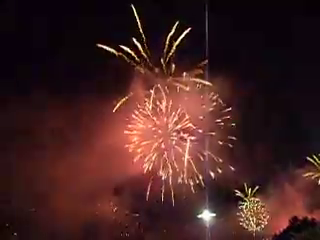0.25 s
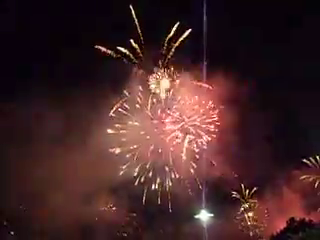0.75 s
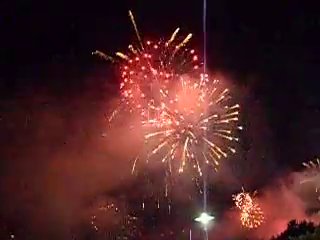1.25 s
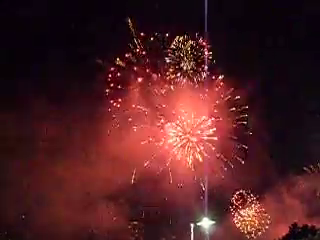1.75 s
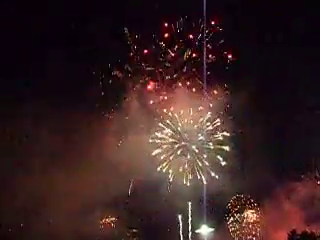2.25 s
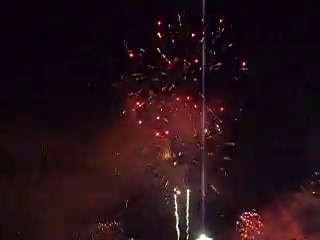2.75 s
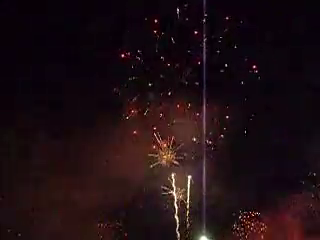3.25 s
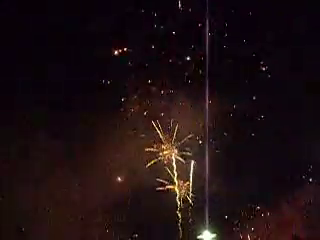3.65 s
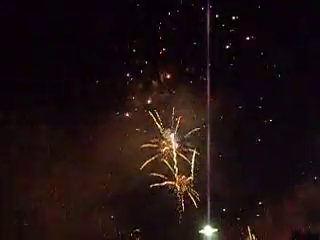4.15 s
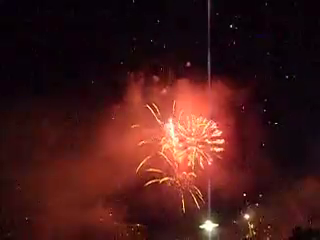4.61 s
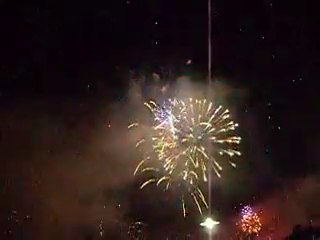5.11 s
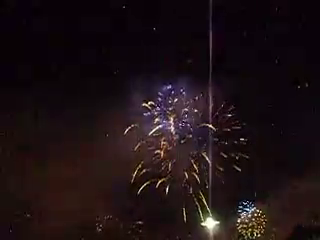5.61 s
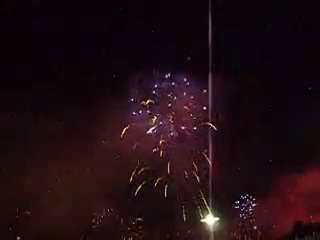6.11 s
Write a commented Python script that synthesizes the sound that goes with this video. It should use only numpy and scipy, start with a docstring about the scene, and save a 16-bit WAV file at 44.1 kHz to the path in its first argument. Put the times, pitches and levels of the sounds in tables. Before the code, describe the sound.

Aerial fireworks burst in quick, irregular succession, heard outdoors among buildings some way from the display. Each sharp bang slaps off the walls and trails into a rolling tail. Smaller cracks, distant pops and dull thuds fill the gaps over a continuous low rumble. A brief faint whistle sounds late on, before two more hard bangs. The biggest shells overload the microphone slightly.

```python
"""Outdoors among buildings at night, some way from a firework display: shells burst in quick succession. Each
blast wave arrives as a steep shock front, reflects off walls and scatters into a rolling tail. Small charges
crack and dull thuds sound in between, over a continuous low rumble and faint whistles. The biggest shells
overload the recorder, which clips their peaks."""
import sys
import numpy as np
from scipy import signal
from scipy.fft import rfft, irfft, next_fast_len
from scipy.io import wavfile
from scipy.ndimage import uniform_filter1d

SR = 44100
rng = np.random.default_rng(int(sys.argv[2]) if len(sys.argv) > 2 else 0)


def pcm_store(signal):
    """Save signal as 16-bit PCM."""
    levels = np.round(np.clip(np.atleast_2d(signal), -1, 1) * 32767)
    wavfile.write(sys.argv[1], SR, levels.astype(np.int16).T)


N = 280917
TIME = np.arange(N) / SR

# Levels in the tables are relative; each layer has its own gain in the mix.
# large shells: (time [s], shock level [dB], compression length [ms], front cutoff [Hz],
# scatter level [dB], roll level [dB], facade echo delay [s], echo level re shock [dB])
LARGE_SHELLS = [(0.0056, 5.5, 4, 7000, -4.5, -3, .0701, 2.5), (0.5987, 10.5, 4.5, 7000, -2.5, 0, 0.087, 2),
                (1.3902, 12.5, 4.2, 7000, -3.5, 0, 0.078, -1),
                (1.5447, 13.5, 2, 9600, -3, -0.5, .0864, -10.5),
                (2.21, 7.5, 2.3, 5000, -3.5, -2.5, 0.085, -3.5),
                (2.4544, 17, 1.53, 9000, -1.5, -0.5, 0.066, -11.5),
                (3.4, 6.5, 4.2, 7000, -6.5, -12, 0.091, -5), (3.6339, 2.5, 2, 1680, -8.5, -14, 0.091, 4.5),
                (3.6482, 7.5, 1.6, 6950, -8.5, -15.5, 0.094, -4),
                (3.8777, 12, 4.2, 7000, -10.5, -12, 0.069, -5),
                (4.1557, 1.5, 5.1, 1620, -13, -6.5, .0638, 5),
                (4.3689, 3, 3.3, 1290, -23, -7.5, 0.069, -1.5),
                (5.186, 13.5, 2, 5000, -1.5, -2.5, .0825, -9),
                (5.5502, 15.5, 1.6, 9440, -3, -3, 0.095, -12),
                (6.009, -5.5, 2.4, 1300, -18.5, -16, 0.054, 4.5)]
# small charges: (time [s], shock level [dB], compression length [ms], front cutoff [Hz],
# wall echo level re shock [dB])
SMALL_CHARGES = [(0.1799, -6, 1.8, 1300, -13), (0.2405, 3.5, 3.7, 1870, -12), (0.5769, 2, 1.5, 1250, -24),
                 (0.731, -7, 1.4, 2700, -15), (0.9657, 2, 2.3, 1900, -27), (1.096, -10, 0.12, 2700, -21),
                 (1.1649, -6, 0.23, 6000, 1.5), (1.3527, -1, 3.6, 900, -14), (1.7067, -6, 0.15, 4000, -12),
                 (1.7263, 0, 4.9, 2700, -9), (2.0015, -3, 1.5, 1300, -23), (2.0832, -9.5, 1.3, 9000, -18),
                 (2.2495, -0.5, 0.11, 7040, -18.5), (2.7635, 1.5, 1.9, 1870, -24),
                 (2.7964, 1.5, 0.17, 6000, -5.5), (3.0907, -7, 1.9, 4000, 1.5), (3.1671, 4, 1.9, 8000, -5),
                 (3.2267, 1.5, 4.9, 2000, -16), (3.2368, 0.5, 7.7, 2700, -24),
                 (3.2824, -9.5, .2, 8900, -17), (4.528, 0.5, 0.49, 2720, -10), (4.6258, -10, 2, 2700, 4.5),
                 (4.7666, -2, 4.1, 2700, -7), (5.017, -3, 3.9, 1180, -19), (5.375, 4.5, 1.6, 1300, -25),
                 (6.031, 1.5, 2.8, 7000, -18)]
# reflectors close by: (delay [s], level [dB], lower band edge [Hz], upper band edge [Hz])
NEAR_REFLECTORS = [(.0046, -4, 423, 1038), (0.0168, -16, 382, 1530)]
# microphone response to a shock front: (frequency [Hz], level [dB])
MIC_RESPONSE = [(60, -2.5), (150, 2.5), (260, -2.5), (420, 2.5), (1000, 1.5), (1400, -2), (2000, 0.5),
                (2700, 1.5), (5000, 0.5), (7000, 0)]
# spectra of the early scatter and of the long roll: (frequency [Hz], level [dB])
SCATTER_SPECTRUM = [(30, -28.5), (70, -8.5), (130, 4), (240, 4.5), (350, -6), (470, -5), (600, -12),
                    (950, -16.5), (1400, -35.5), (2500, -30.5), (4000, -39), (6500, -43.5)]
ROLL_SPECTRUM = [(25, -22.5), (60, -4), (150, 3), (230, -2), (360, -10.5), (550, -15.5), (1000, -21),
                 (1400, -33), (2600, -37), (6500, -49.5)]
# dull low thuds and the deep booms of large shells: (time [s], level [dB])
DEEP_THUDS = [(0.7, -10.5), (1.142, -19), (1.41, -16), (1.78, -16.5), (2.01, -21), (2.47, -5), (3.068, -13),
              (3.72, -25.5), (3.86, -11), (4.195, -9), (4.604, -14), (4.745, -14.5), (5.27, -19)]
# envelope of the bass rumble: (time [s], level [dB])
RUMBLE_ENVELOPE = [(0.0, -18), (0.3, -25.5), (2.68, -18.5), (2.82, -22.5), (5.06, -23), (5.48, -21),
                   (5.68, -27.5), (6.37, -23)]
# spectra of the bass rumble and of the soft roar: (frequency [Hz], level [dB])
RUMBLE_SPECTRUM = [(18, -20), (28, -7.5), (46, -6), (72, -4), (105, -4.5), (170, -12.5), (300, -33)]
ROAR_SPECTRUM = [(80, -8.5), (150, 2.5), (250, -1.5), (360, -8.5), (480, -7.5), (750, -11.5), (1050, -17),
                 (1400, -31.5), (2000, -32.5), (2700, -33.5), (3700, -44.5), (6500, -52.5)]
# distant whistles: (start [s], end [s], pitch [Hz], pitch spread [Hz], level [dB])
WHISTLE_TONES = [(4.85, 4.92, 1070, 28, -27), (5.25, 6.6, 3335, 8, -60)]


def shock(db, compression_ms, front_hz):
    """Friedlander blast wave: a steep front sinks through zero into a longer, weaker suction."""
    age = TIME[:SR // 20] / (compression_ms / 1000)
    wave = -from_db(db) * (1 - age) * np.exp(-age)
    # turbulence gives the front a finite rise time: a two-pole low-pass
    pole = np.exp(-2 * np.pi * front_hz / SR)
    return signal.lfilter([(1 - pole) ** 2], [1, -2 * pole, pole * pole], wave + 1e-18)


def bursts():
    """Multipath propagation: each shock arrives directly, off reflectors close by and off a wall."""
    fronts, echoes = [], []
    for s, db, ms, front_hz, _, _, delay_s, echo_db in LARGE_SHELLS:
        fronts.append((s, shock(db, ms, front_hz)))
        facade_echo = shock(db + echo_db, compression_ms=1.5, front_hz=2000)
        echoes.append((s + delay_s, facade_echo))
    for s, db, ms, front_hz, echo_db in SMALL_CHARGES:
        fronts.append((s, shock(db, ms, front_hz)))
        wall_slap = shock(db + echo_db, compression_ms=0.31, front_hz=3950)
        echoes.append((s + 0.0156, wall_slap))  # the near wall answers sooner than the facade
    out, bounced = np.zeros((2, N))
    for s, front in fronts:
        add(out, s, diffuse(front, t60=0.038, roughness=0.33))
        add(bounced, s, diffuse(front, t60=0.093, roughness=0.71))
    for s, echo in echoes:
        add(out, s, diffuse(echo, t60=0.045, roughness=0.56))
    for delay_s, db, low_hz, high_hz in NEAR_REFLECTORS:
        reflected = cut(cut(bounced, low_hz, "high"), high_hz, "low", order=4)
        add(out, delay_s, from_db(db) * reflected)
    return out


def diffuse(x, t60, roughness):
    """Diffuse reflection: an uneven surface follows each front with a short spray of smaller ones."""
    t = TIME[:SR // 10]
    spray = rng.standard_normal(len(t)) * from_db(-60 * t / t60)
    spray *= roughness / np.sqrt(np.sum(spray ** 2))
    spray[0] += 1
    return signal.fftconvolve(x, spray)[:N]


def reverberation(spectrum, shells, rise_s, t60, echoes_per_s, clump_db=2.5, first_echo_s=0.004):
    """Scattering: echoes of shells (time [s], level [dB]) and small charges come in clumps and decay."""
    # a small charge's tail grows with the length of its shock
    charges = [(s, db - 21 + 2.17 * np.log2(ms)) for s, db, ms, _, _ in SMALL_CHARGES]
    onsets = [(s + first_echo_s, db) for s, db in [*shells, *charges]]
    echoes = rng.standard_normal(N) * (rng.random(N) < echoes_per_s / SR)
    echoes *= from_db(clump_db * drift(50))
    return steady(colour(echoes, spectrum)) * swells(onsets, rise_s, t60)


def far_shells(per_s, db, spread_db, front_hz):
    """Air absorption dulls the small shells that pop at random farther along the display."""
    out = np.zeros(N)
    for when, weakness, length in rng.random((int(per_s * N / SR), 3)):
        add(out, when * N / SR, shock(db - spread_db * weakness, 0.5 + 2 * length, front_hz))
    return diffuse(out, t60=0.092, roughness=1.1)


def rumble(bass_db, throb_db, roar_db, flutter_db):
    """Incoherent addition: thuds, booms and distant bursts merge into a throbbing bass and a soft roar."""
    bed_db = np.interp(TIME, *np.transpose(RUMBLE_ENVELOPE)) + bass_db + throb_db * drift(8)
    thuds = swells(DEEP_THUDS, rise_s=0.0045, t60=0.77)
    busy_db = 2.5 * np.exp(-(TIME - 3.55) ** 2)  # a lift while the shells come thickest
    roar_gain = from_db(roar_db + busy_db + flutter_db * drift(19))
    bass = steady(colour(rng.standard_normal(N), RUMBLE_SPECTRUM))
    roar = steady(colour(rng.standard_normal(N), ROAR_SPECTRUM))
    return np.hypot(from_db(bed_db), thuds) * bass + roar_gain * roar


def whistles(fade_s=0.026, flicker_db=2.3):
    """Random frequency and amplitude modulation make thin, distant tones waver."""
    out = np.zeros(N)
    for start, end, hz, waver_hz, db in WHISTLE_TONES:
        gate = np.clip(np.minimum(TIME - start, end - TIME) / fade_s, 0, 1)
        phase = 2 * np.pi * np.cumsum(hz + waver_hz * drift(40)) / SR
        out += gate * from_db(db + flicker_db * drift(8.6)) * np.sin(phase)
    return out


def swells(events, rise_s, t60):
    """Power summation: the joint envelope of events (time [s], level [dB]) that rise and decay."""
    shape = from_db(-60 * TIME / t60) * (1 - np.exp(-TIME / rise_s))
    power = np.zeros(N)
    for s, db in events:
        add(power, s, (from_db(db) * shape) ** 2)
    return np.sqrt(power)


def colour(x, spectrum):
    """Minimum-phase filtering: imposes a spectrum causally and keeps the power of white noise."""
    size = next_fast_len(N + SR // 2) * 2
    hz, db = np.transpose(spectrum)
    bin_hz = np.maximum(np.fft.rfftfreq(size, 1 / SR), 1)
    octaves_outside = np.maximum(np.log2(hz[0] / bin_hz), 0) + np.maximum(np.log2(bin_hz / hz[-1]), 0)
    gain_db = np.interp(np.log(bin_hz), np.log(hz), db) - 12 * octaves_outside
    gain = rms_one(from_db(gain_db))
    cepstrum = irfft(np.log(gain), size)[:size // 2]
    cepstrum[1:] *= 2  # folding onto positive time makes the filter causal
    return irfft(rfft(x, size) * np.exp(rfft(cepstrum, size)), size)[:N]


def steady(x):
    """Running normalisation: holds rms near 1 over 0.1 s, so that an envelope alone sets the swells."""
    power = np.abs(uniform_filter1d(x * x, SR // 10))
    return x / np.sqrt(power + 1e-12)


def drift(hz):
    """Low-pass noise: a smooth random wander of rms 1."""
    return rms_one(cut(rng.standard_normal(N + SR), hz, "low")[SR:])


def cut(x, hz, kind, order=2):
    """Butterworth filtering, low- or high-pass."""
    return signal.sosfilt(signal.butter(order, hz, kind, fs=SR, output="sos"), x + 1e-18)


def add(track, s, sound):
    """Superposition of a sound on a track at time s."""
    at = int(np.clip(round(s * SR), 0, N - 1))
    track[at:at + len(sound)] += sound[:N - at]


def rms_one(x):
    """Normalisation to rms 1."""
    return x / np.sqrt(np.mean(x ** 2) + 1e-20)


def from_db(db):
    """Decibel law: level to amplitude ratio."""
    return 10 ** (np.asarray(db) / 20)


def scene():
    """Linear superposition of shocks, early scatter, the long roll, rumble, whistles and a steady hiss."""
    times, _, _, _, scatter_db, roll_db, _, _ = np.transpose(LARGE_SHELLS)
    fronts = bursts() + far_shells(per_s=13, db=-13.5, spread_db=13.5, front_hz=1600)
    # the microphone port thins the bass of a shock and makes it swing back
    shocks = cut(colour(fronts, MIC_RESPONSE), 75, "high")
    scatter = reverberation(SCATTER_SPECTRUM, zip(times, scatter_db),
                            rise_s=0.0016, t60=0.55, echoes_per_s=1600)
    roll = reverberation(ROLL_SPECTRUM, zip(times, roll_db), rise_s=0.022, t60=1.386, echoes_per_s=6000)
    background = rumble(bass_db=1.5, throb_db=1.5, roar_db=-23, flutter_db=1.03) + whistles()
    hiss = from_db(-56) * rng.standard_normal(N)
    mix = from_db(-4) * shocks + from_db(-1.5) * scatter + from_db(-7.5) * roll + background + hiss
    return mix[None]


def record(dry):
    """Saturation: a band-limited recorder clips the biggest bursts flat."""
    overload, ceiling = 0.703, 0.71  # fractions of full scale
    clipped = np.clip(cut(dry, 6850, "low", order=16), -overload, overload)
    smoothed = signal.sosfiltfilt(signal.butter(16, 7300, fs=SR, output="sos"), clipped)
    # the steepest fronts overshoot in the filter and hit the ceiling again, with a thin snap
    reclipped = np.clip(smoothed, -ceiling, ceiling)
    return signal.sosfilt(signal.cheby1(10, 0.1, 16000, fs=SR, output="sos"), reclipped)


dry = scene()
out = record(dry)
pcm_store(out)
```